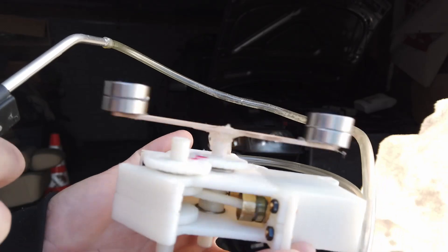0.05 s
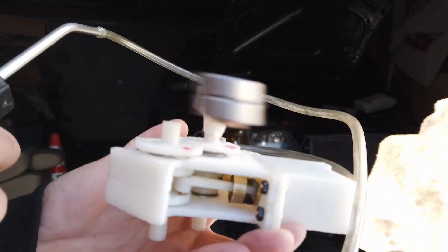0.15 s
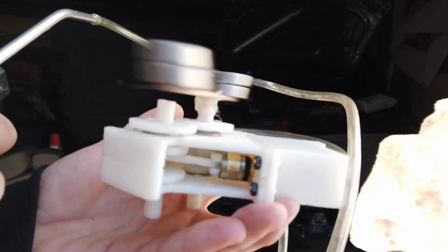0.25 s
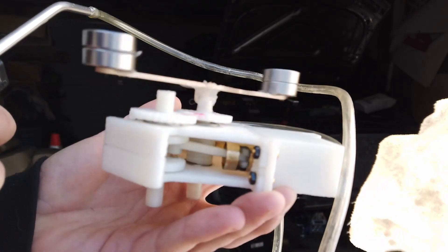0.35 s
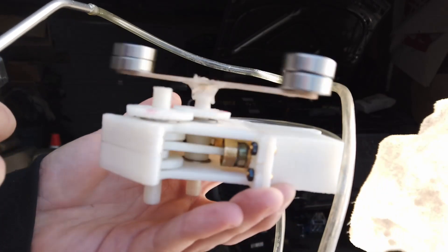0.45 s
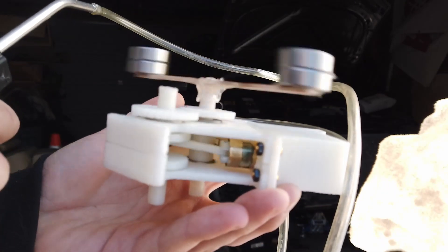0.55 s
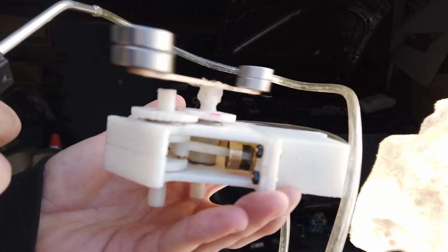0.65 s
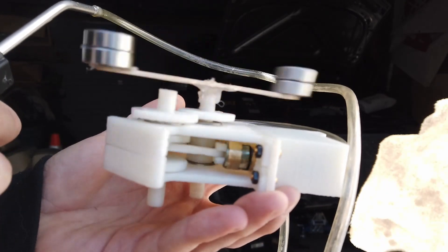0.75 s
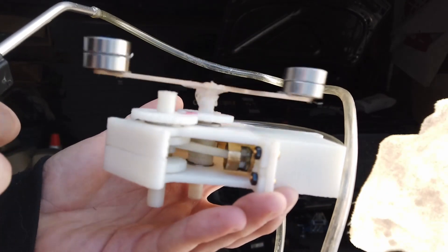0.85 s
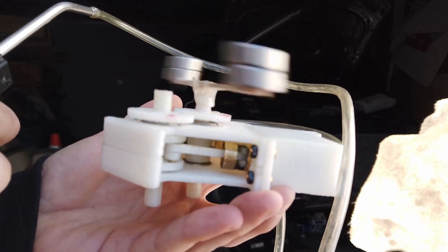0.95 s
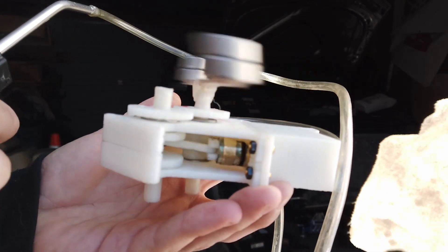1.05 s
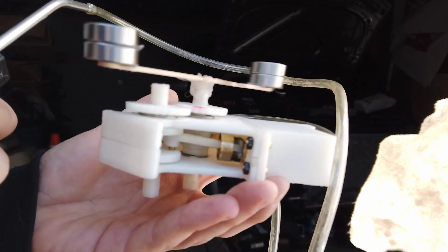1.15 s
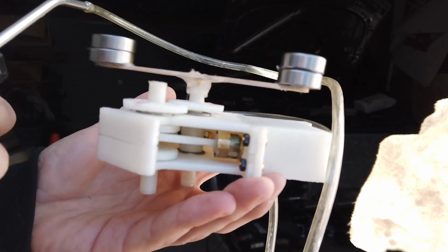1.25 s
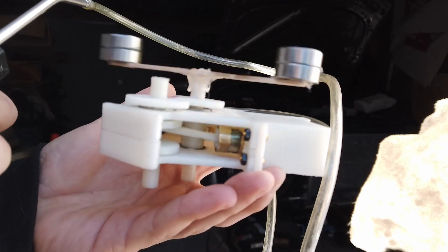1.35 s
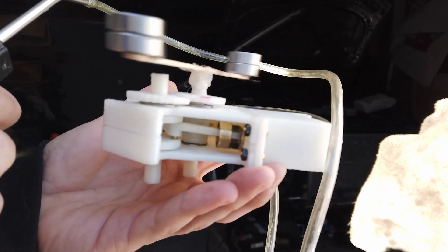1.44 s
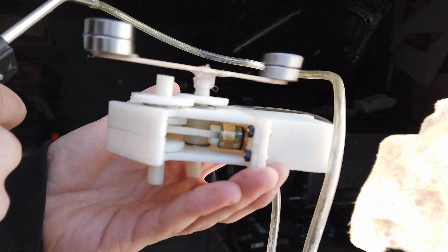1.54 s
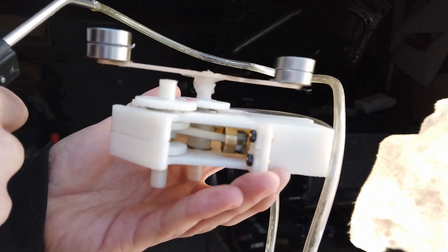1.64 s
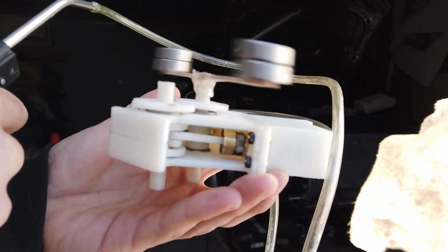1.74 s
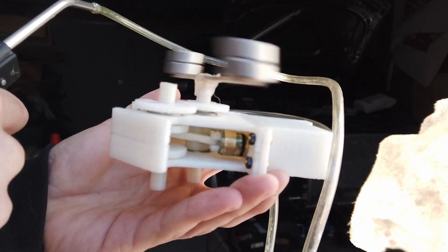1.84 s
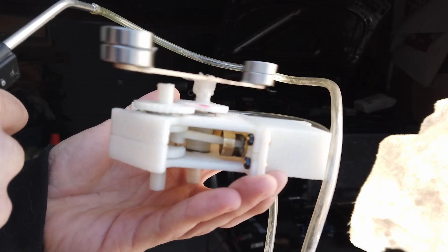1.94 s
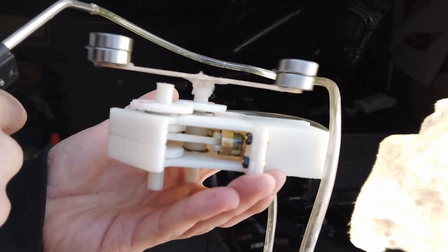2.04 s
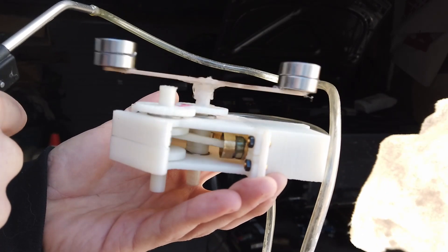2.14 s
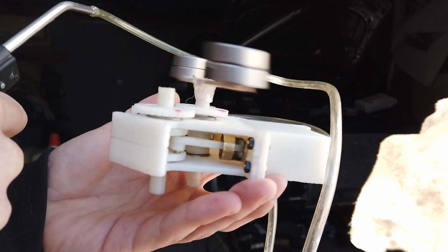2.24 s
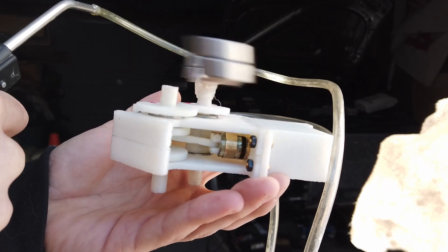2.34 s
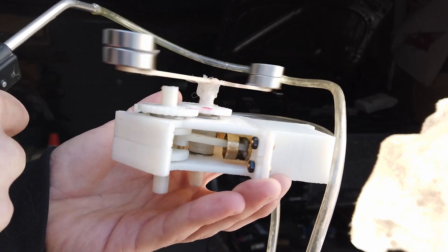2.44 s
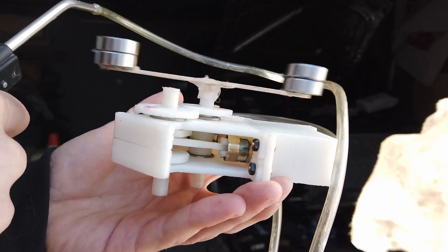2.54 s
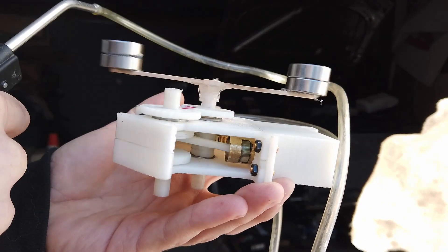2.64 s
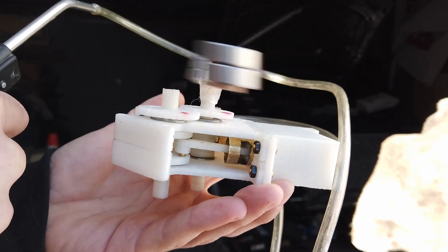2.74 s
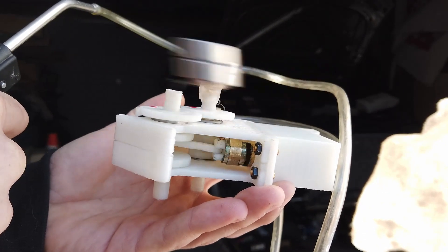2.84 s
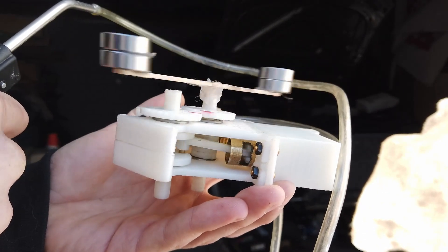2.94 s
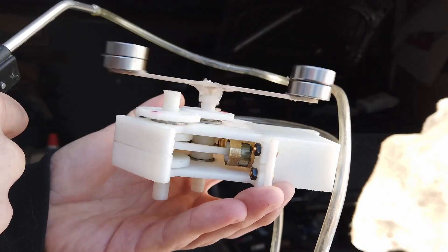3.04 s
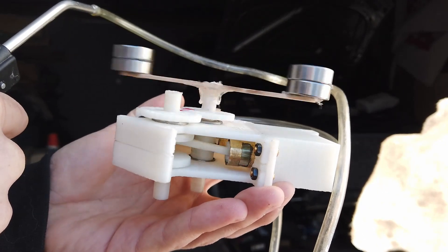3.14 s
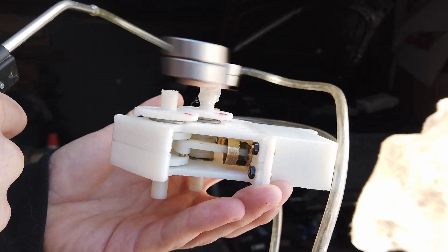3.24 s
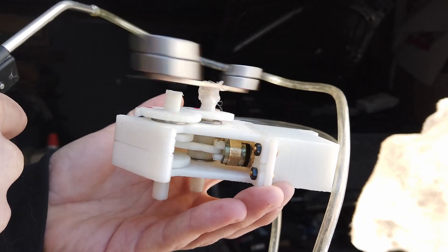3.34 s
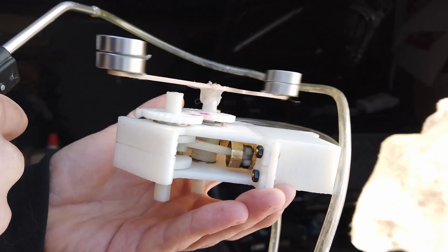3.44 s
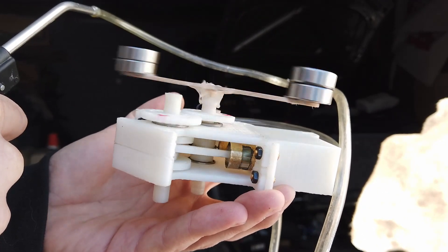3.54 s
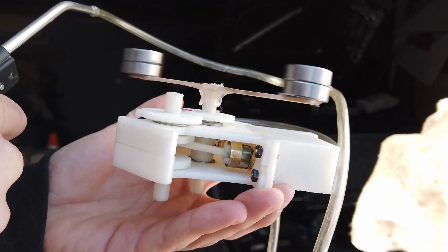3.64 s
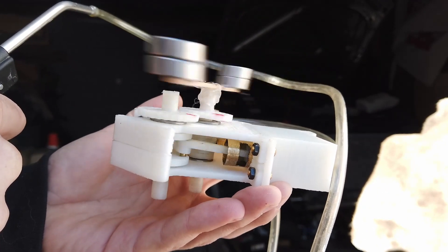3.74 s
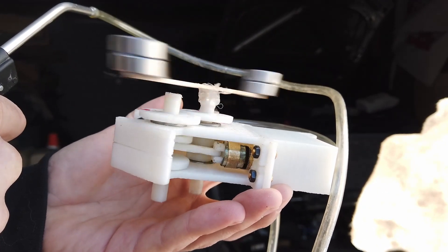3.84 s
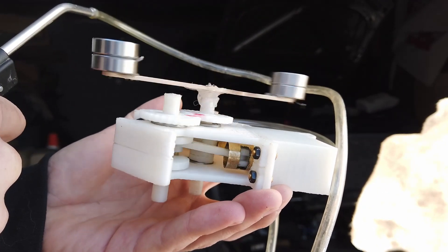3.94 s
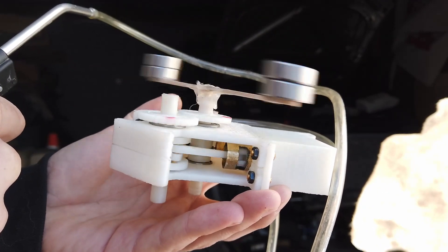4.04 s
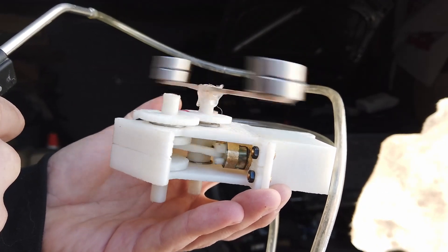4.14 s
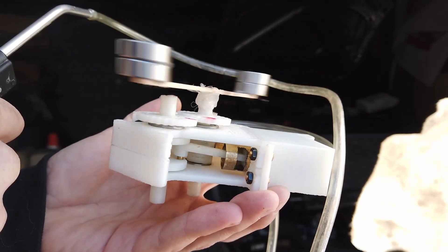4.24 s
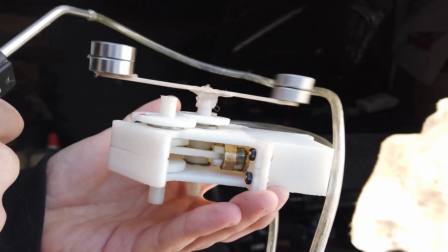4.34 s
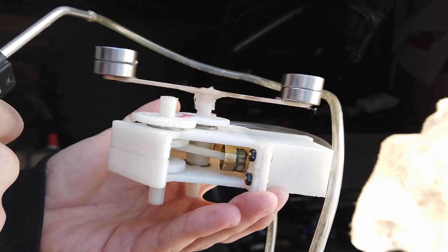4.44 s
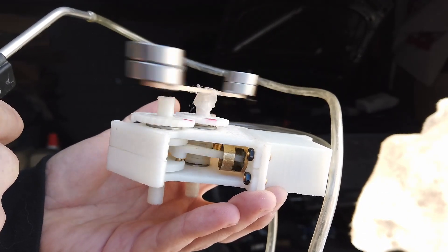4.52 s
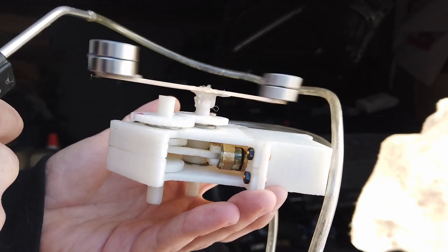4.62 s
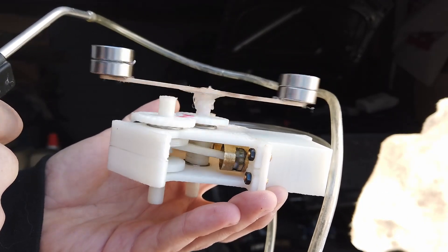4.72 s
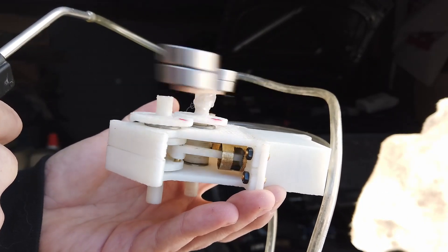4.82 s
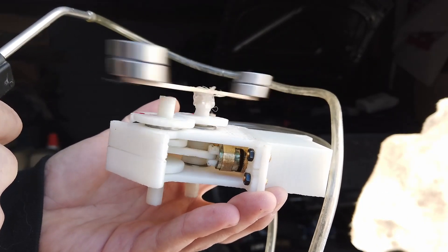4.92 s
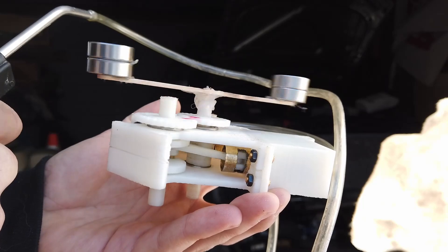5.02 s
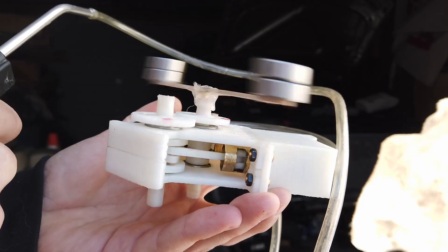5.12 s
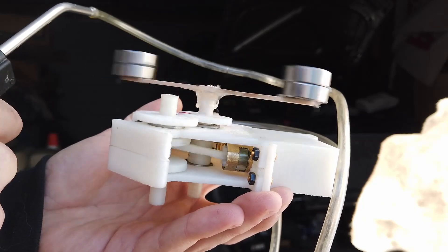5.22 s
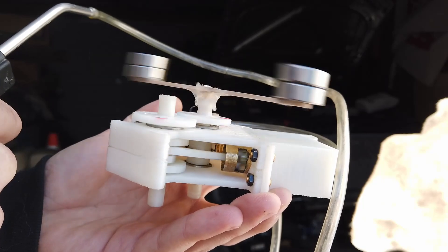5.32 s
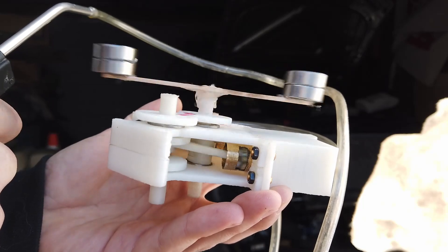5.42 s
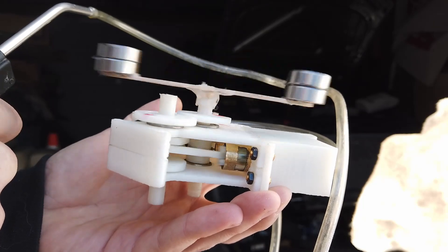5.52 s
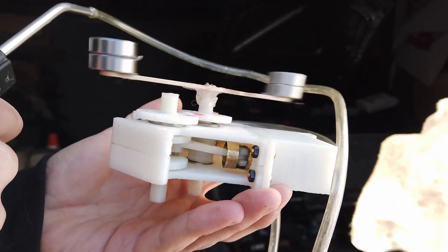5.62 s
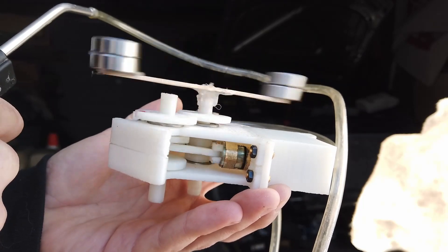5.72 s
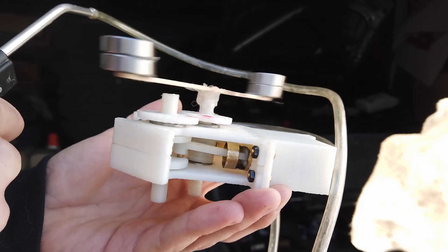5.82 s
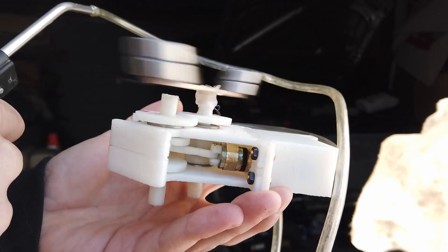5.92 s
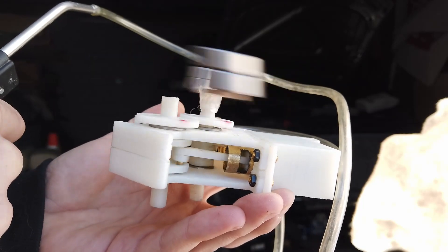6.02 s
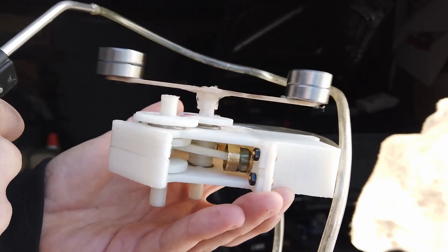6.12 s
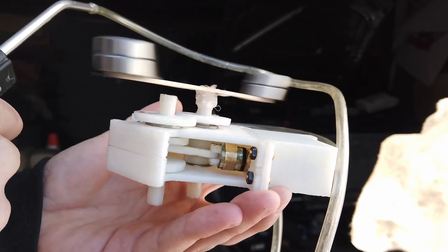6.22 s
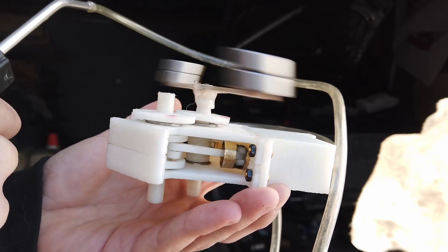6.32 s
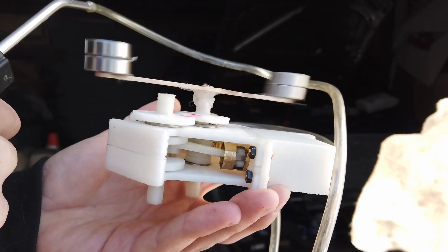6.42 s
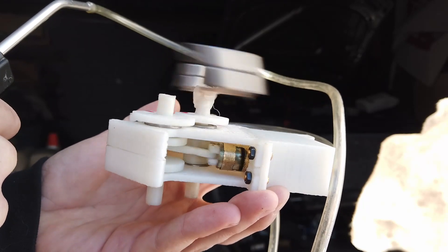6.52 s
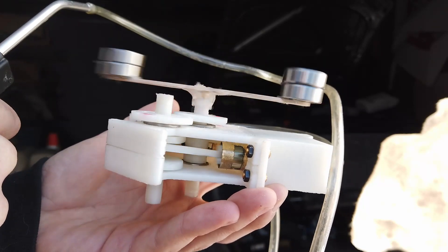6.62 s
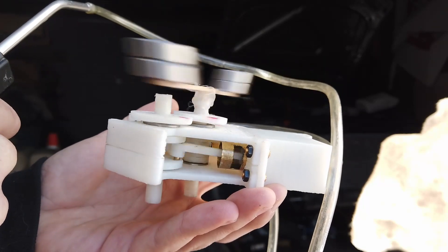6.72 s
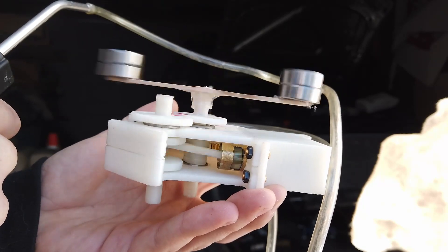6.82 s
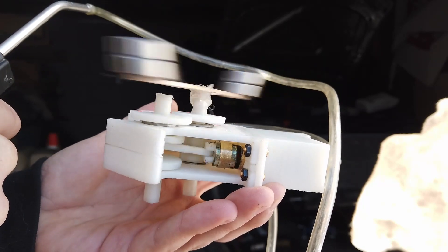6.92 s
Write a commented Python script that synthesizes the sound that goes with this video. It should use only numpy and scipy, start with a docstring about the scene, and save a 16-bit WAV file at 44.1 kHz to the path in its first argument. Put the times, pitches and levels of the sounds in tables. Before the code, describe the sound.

A small hand-held plastic engine driven by compressed air is already running, very close to the microphone and a touch louder in the first half second. It turns just under four times a second. Each turn repeats one pattern: thin leaking air with light, uneven rattles, a crisp bouncing tick, a spurt of bright inlet hiss, a rasp and hollow knock, then a short hard exhaust blast ending in a clack. The pace barely wavers until 4.3 seconds; soft low handling thumps lie underneath around 1.5 and 3.9. Near 4.8 it sags to about three and a half turns a second, weaker. From 5.2 it surges to over five, and from 6.0 climbs again past seven by 6.9, the blows louder, tighter and crowding together. The strongest ones overload with a crunch. A faint workshop rumble and short diffuse echo surround it, and it is still running at the end.

```python
"""A hand-held plastic compressed-air engine, nearest the microphone at first, turns about four times a second.
In every turn air leaks, the linkage ticks, the inlet hisses, the piston knocks, the exhaust blows off with a clack.
Near the end the engine sags, then is given more air in two steps and speeds up.
One speed curve times every event through the crank angle; the air pressure worked out from it sets their strength.
All along, the loudest blows overload the recorder, and the workshop adds a short tail and a faint rumble."""
import sys
import numpy as np
from scipy import signal
from scipy.fft import irfft, next_fast_len
from scipy.io import wavfile

SR = 44100
rng = np.random.default_rng(int(sys.argv[2]) if len(sys.argv) > 2 else 0)


def wrap_up_sound(samples):
    """Save the sound to the file named by the first command line argument, as 16-bit audio."""
    columns = np.atleast_2d(samples).T
    # keep every value between -1 and 1, then stretch to whole-number steps
    tamed = np.clip(columns, -1, 1)
    steps = np.round(tamed * 32767).astype(np.int16)
    wavfile.write(sys.argv[1], SR, steps)


N = 307377
TIME = np.arange(N) / SR  # seconds

IDLE_TURNS_PER_S = 4
# Crank angles in turns, counted from the clack.
START_ANGLE, TICK_ANGLE, INLET_ANGLE, KNOCK_ANGLE, CLACK_ANGLE = .641, .47, .71, .865, 0

# How fast the flywheel turns. Each row: time in seconds, speed in turns per second.
SPEED = [(0, 3.854), (.68, 3.783), (1.3, 3.833), (2.07, 3.906), (2.42, 3.996), (2.98, 3.908), (3.62, 3.949),
         (4.1, 3.842), (4.34, 3.857), (4.81, 3.46), (5.16, 3.632), (5.36, 5.346), (5.62, 5.479),
         (5.97, 5.198), (6.02, 5.946), (6.36, 6.998), (6.9, 7.343)]


def speed_at(t):
    """Flywheel speed in turns per second, in straight lines between the table's points."""
    return np.interp(t, *np.transpose(SPEED))


# At speed the tick comes later in the turn, the inlet and the knock earlier.
# Each row: crank angle in turns, delay in turns for each turn per second above idle.
VALVE_DELAY = [(0, 0), (TICK_ANGLE, .0107), (INLET_ANGLE, -.005), (KNOCK_ANGLE, -.0066), (1, 0)]


def crank():
    """Crank position in turns: the speed summed up, with the valve timing shifting as the engine runs faster."""
    speed = speed_at(TIME)
    turns = START_ANGLE + np.cumsum(speed) / SR
    delay_per_speed = np.interp(turns % 1, *np.transpose(VALVE_DELAY))
    return turns - (speed - IDLE_TURNS_PER_S) * delay_per_speed


def passes(turns, angle):
    """The times in seconds at which the crank passes an angle, once a turn."""
    whole_turns = np.floor(turns - angle)
    return np.flatnonzero(np.diff(whole_turns) > 0) / SR


# Pressure level at idle speed, the power of speed it rises with, and how long the flywheel takes to follow it.
IDLE_PRESSURE_DB, PRESSURE_POWER, FLYWHEEL_LAG_S = -0.72, 1.68, 0.058


def pressure_at(t):
    """Air pressure in dB: a power of the speed that the flywheel reaches a moment later."""
    speed_ratio = speed_at(t + FLYWHEEL_LAG_S) / IDLE_TURNS_PER_S
    return IDLE_PRESSURE_DB + PRESSURE_POWER * 20 * np.log10(speed_ratio)


# Air flow over one turn, from clack to clack, before the pressure is added.
# Each row: crank angle in turns, hiss in dB, cylinder rasp in dB, draught in dB.
FLOW = [(0, -51, -28, -56), (.1, -68, -39, -41), (.34, -44.5, -50.5, -51), (0.363, -32, -32, -54),
        (.40, -27, -35, -50), (.455, -21, -29.5, -40.5), (.50, -22.5, -27.5, -44.5), (.56, -31.5, -45, -44),
        (.67, -29.5, -28, -45), (.70, -28.5, -31, -31), (.73, -15, -21, -24), (.78, -25.5, -19.5, -32.5),
        (0.857, -30.5, -18, -47), (.885, -30.5, -31, -48), (.95, -31, -39, -31), (1, -41, -23, -45)]
# Colours of the leak, the inlet hiss, the rasp and the draught. Each row: frequency in Hz, level in dB per Hz.
LEAK = [(900, -20.5), (1700, -2.5), (2700, -13.5), (3500, 1.5), (4300, -6.5), (5100, -4), (7600, -12),
        (10200, -1), (11500, -5), (13000, -2), (16000, -10)]
HISS = [(1000, -14.5), (2000, 0), (3000, -10.5), (5000, -8.5), (6200, -7), (8300, -1.5), (10200, -5.5),
        (11300, -6.5), (13000, -7.5), (16000, -13)]
RASP = [(450, -20.5), (650, -19.5), (900, -18.5), (1200, -6.5), (1450, -2), (1700, 1.5), (2050, -2.5),
        (2500, -10.5), (3300, -16), (4300, -19), (7000, -30)]
DRAUGHT = [(15, -18), (60, -2), (100, -6), (150, -6.5), (250, -5.5), (400, -13.5), (650, -19), (1500, -36)]
# Narrow resonances of the valve port, heard in the jets. Each row: frequency in Hz, width in Hz, level in dB.
PORT = [(10160, 135, 8.5), (10360, 320, 7)]


def air(turns, leak_share=0.74, rasp_follow=1.26):
    """Leak, inlet hiss, rasping cylinder cavity and a low draught: noises whose levels follow the crank."""
    angle = turns % 1
    pressure_db = pressure_at(TIME)
    points, *columns = np.transpose(FLOW)
    hiss_db, cavity_db, draught_db = (np.interp(angle, points, c) for c in columns)
    # the leak follows the pressure less than the open inlet does
    drive_db = np.where(angle > .66, 1, leak_share) * pressure_db
    jet = np.where(angle < TICK_ANGLE, noise(LEAK, PORT), noise(HISS, PORT))
    hiss = jet * undb(hiss_db + drive_db) * flutter(300, depth_db=2.5)
    rasp = noise(RASP) * undb(cavity_db + rasp_follow * drive_db) * flutter(350, depth_db=2.5)
    draught = noise(DRAUGHT, apart=0.047) * undb(draught_db + drive_db)
    return hiss + rasp + draught


# How one blast swells and dies, before pressure and chance. Each row: seconds from the clack, level in dB.
BLAST = [(-.016, -72), (-.0112, -55), (-.0092, -19.5), (-.006, -12), (-.0035, -8), (-.001, -12),
         (.003, -21), (.01, -40.5), (0.022, -74)]
# Colour of the exhaust jet. Each row: frequency in Hz, level in dB per Hz.
EXHAUST = [(20, -8), (100, -1.5), (200, -3.5), (480, -4), (850, -3.5), (1200, -3.5), (1800, 0.5),
           (2800, -14), (5200, -8), (6500, -12), (8200, -4), (10200, -7.5), (11300, -10.5), (16000, -18)]


def exhaust(turns, shorten_per_db=0.0046, follow=0.58, blast_db=0.5, scatter_db=1.55):
    """The port opens just before each clack and the cylinder empties, quicker and louder at high pressure."""
    lag, shape_db = np.transpose(BLAST)
    clack = passes(turns, CLACK_ANGLE)[:, None]  # one row for each blast
    pressure_db = pressure_at(clack)
    exhaust_db = blast_db + follow * pressure_db + scatter_db * rng.standard_normal(clack.shape)
    times = clack + lag * (1 - shorten_per_db * pressure_db)
    blast = np.interp(TIME, times.ravel(), undb(shape_db + exhaust_db).ravel())
    return noise(EXHAUST, PORT) * blast * flutter(500, depth_db=0.95)


# Exhaust puff: lead before the clack and width, both at 0 dB pressure.
EXHAUST_LEAD_S, EXHAUST_PUFF_S = .0088, .0013
# The share by which each dB of pressure shortens the lead and the puff widths.
QUICKER_PER_DB = .028


def puffs(turns, inlet_follow=0.44, inlet_db=-25, exhaust_follow=1.0, exhaust_db=-17.5,
          knock_follow=0.74, knock_db=-14, clack_follow=0.37, clack_db=-7):
    """Low thuds of air shoved out as ports open and cut off as the piston stops; pressure makes them louder."""
    out = np.zeros((2, N))
    for tick in passes(turns, TICK_ANGLE):
        add_stop(out, tick, width=0.00034, db=0.13 * pressure_at(tick) - 14.5)
    inlets, knocks, clacks = (passes(turns, angle) for angle in (INLET_ANGLE, KNOCK_ANGLE, CLACK_ANGLE))
    for inlet, knock, clack in zip(inlets, knocks, clacks):
        pressure_db = pressure_at(knock)
        quick = 1 - QUICKER_PER_DB * pressure_db
        add_puff(out, inlet + 0.0036, width=0.0026 * quick, db=inlet_db + inlet_follow * pressure_db)
        exhaust_opens = clack - EXHAUST_LEAD_S * quick
        exhaust_puff_db = exhaust_db + exhaust_follow * pressure_db
        add_puff(out, exhaust_opens, width=EXHAUST_PUFF_S * quick, db=exhaust_puff_db)
        add_stop(out, knock, width=0.00085, db=knock_db + knock_follow * pressure_db)
        add_stop(out, clack, width=0.00077, db=clack_db + clack_follow * pressure_db)
    return out


def add_puff(out, centre, width, db):
    """A parcel of air shoved out radiates the slope of its flow: a push and then a pull."""
    reach = 5 * width
    u = np.arange(-reach, reach, 1 / SR) / width
    push_pull = -u * np.exp((1 - u ** 2) / 2)
    add(out, undb(db) * push_pull[None], centre - reach)


def add_stop(out, end, width, db):
    """A flow that is cut off leaves a short dip in pressure."""
    reach = 5 * width
    u = np.arange(-reach, reach, 1 / SR) / width
    dip = -np.exp(-u ** 2 / 2)
    add(out, undb(db) * dip[None], end - width - reach)


# Ringing tones of the tick, the knock and the clack, before the strength of the blow and chance.
# Each row: frequency in Hz, peak level in dB, seconds to fade by 60 dB.
TICK_MODES = [(620, -15.5, 0.014), (1234, -13, 0.013), (1663, -3.5, .017), (2023, -10.5, 0.0097),
              (5000, -23, 0.014), (7200, -13.5, 0.0087), (8140, -14.5, 0.013), (9800, -11, 0.017),
              (10310, -12, 0.015)]
KNOCK_MODES = [(315.4, -7, 0.028), (729, -10.5, 0.0079), (955, -15, 0.035), (1547, 6.5, 0.0088),
               (1781, 5.5, 0.01), (2530, -21, 0.015), (3500, -49, 0.0065)]
CLACK_MODES = [(306.6, -7.5, 0.053), (694, -12, 0.02), (1029, 0.5, 0.03), (1260, 6, 0.0074),
               (1543, 2, 0.012), (2615, -16.5, 0.025), (4020, -26, 0.027)]
# Colour of the tick's noisy crack. Each row: frequency in Hz, level in dB per Hz.
CRACK = [(800, -10), (2500, 3), (4000, -7.5), (8000, -3), (10500, -10), (11500, -11), (16000, -26)]


def linkage(turns, bounce_s=.0025, bounce_db=-6, crack_db=-10, crack_t60=0.021, knock_force=0.62,
            clack_force=0.23, tick_force=0.078, tick_db=-0.4, tick_scatter_db=1.4):
    """The linkage's play closes three times a turn: a bouncing tick, a knock and a clack, harder at high pressure."""
    out, cracks = np.zeros((2, N)), np.zeros((2, N))
    crack = np.exp(-np.log(1000) * TIME[None, :SR // 10] / crack_t60)
    for tick in passes(turns, TICK_ANGLE):
        blow_db = tick_db + tick_force * pressure_at(tick) + tick_scatter_db * rng.standard_normal()
        add(out, ring(TICK_MODES) * undb(blow_db), tick)
        bounce = tick + bounce_s * (1 + 0.088 * rng.standard_normal())
        add(out, ring(TICK_MODES) * undb(blow_db + bounce_db), bounce)
        add(cracks, crack * undb(blow_db + crack_db), tick)
    for knock in passes(turns, KNOCK_ANGLE):
        add(out, ring(KNOCK_MODES) * undb(knock_force * pressure_at(knock)), knock)
    for clack in passes(turns, CLACK_ANGLE):
        add(out, ring(CLACK_MODES, detune=0.0023) * undb(clack_force * pressure_at(clack)), clack)
    return out + cracks * noise(CRACK, PORT)


# Light touches of the slack linkage on the return stroke, before pressure and chance.
# Each row: crank angle in turns, level in dB.
CHATTER = [(.283, -21.5), (.327, -15)]


def chatter(turns, force=1.23, scatter_db=2.5, jitter_s=0.00164):
    """The slack linkage rattles lightly and unevenly on the return stroke, ringing three of the tick's modes."""
    out = np.zeros((2, N))
    for angle, db in CHATTER:
        for touch in passes(turns, angle):
            size_db = db + force * pressure_at(touch) + scatter_db * rng.standard_normal()
            add(out, ring(TICK_MODES[1:4]) * undb(size_db), touch + jitter_s * rng.standard_normal())
    return out


# Echo of the workshop in bands of pitch.
# Each row: lowest frequency in Hz, highest frequency in Hz, level in dB, seconds to fade by 60 dB.
ROOM = [(59.5, 240, -35.5, 0.33), (465, 2800, -31, 0.23), (2500, 16500, -22, 0.14)]


def workshop(dry, gap_s=0.012):
    """A short diffuse echo: fading noise, different on each side, that starts after a small gap."""
    t = TIME[:SR // 2]
    response = 0
    for low_hz, high_hz, db, t60 in ROOM:
        band = signal.butter(2, [low_hz, high_hz], "band", fs=SR, output="sos")
        mid, side = signal.sosfilt(band, rng.standard_normal((2, len(t))))
        # low echoes are more alike on the two sides
        stereo = mid + np.array([[1], [-1]]) * side * min(high_hz / 6000, 1)
        tail = stereo * np.exp(-np.log(1000) * t / t60) * (t > gap_s)
        response = response + undb(db) * tail / np.sqrt(np.sum(tail[0] ** 2))
    return signal.fftconvolve(dry, response, axes=1)[:, :N]


# Soft low thumps of handling. Each row: time in seconds, level in dB, length in seconds.
THUMPS = [(1.503, -30, 0.053), (3.85, -27.5, 0.065)]
# Colour of the background rumble. Each row: frequency in Hz, level in dB per Hz.
RUMBLE = [(15, -19), (40, 2), (75, -2), (130, -21), (300, -21), (650, -17), (1000, -27), (4000, -25.5),
          (16000, -52)]
RUMBLE_DB = -44


def rumble():
    """Low background noise that wanders in level, with soft handling thumps made of swelling low noise."""
    swell = sum(undb(db) * np.exp(-((TIME - s) / length) ** 2) for s, db, length in THUMPS)
    thumps = swell * noise([(15, 5), (38, 1), (80, 3), (200, -38), (1000, -70)], apart=0.49)
    background = noise(RUMBLE, apart=0.18) * undb(RUMBLE_DB) * flutter(5.2, depth_db=3)
    return background + thumps


def undb(db):
    """Decibels to gain."""
    return np.exp(np.asarray(db) * (np.log(10) / 20))


def noise(colour, resonances=(), spread_hz=10500, apart=0):
    """Stereo noise with a colour and resonances, its middle at rms 1; the sides agree less toward the treble."""
    hz, db = np.transpose(colour)
    size = next_fast_len(N, real=True)
    f = np.maximum(np.fft.rfftfreq(size, 1 / SR), 1).astype(np.float32)
    peaks = sum(undb(peak_db) ** 2 / (1 + (2 * (f - centre) / width) ** 2)
                for centre, width, peak_db in resonances)
    gain = undb(np.interp(np.log(f), np.log(hz), db)) * np.sqrt(1 + peaks)
    side_gain = gain * np.minimum(apart + f / spread_hz, 1)
    gains = np.array([gain, side_gain], np.float32)
    # pairs of random numbers become complex: a random size and phase at each frequency
    bins = rng.standard_normal((2, 2 * len(f)), dtype=np.float32).view(np.complex64)
    mid, side = irfft(bins * gains, size)[:, :N]
    return np.array([mid + side, mid - side]) / mid.std()


def flutter(rate, depth_db):
    """A gain that wanders at random, with a new goal rate times a second."""
    knots = np.arange(0, N / SR + 1, 1 / rate)
    return undb(depth_db * np.interp(TIME, knots, rng.standard_normal(len(knots))))


def ring(modes, detune=0.017, scatter_db=.5, port_lag=.000012):
    """One blow: fading tones of alternating sign, varied by chance, reaching the left port first."""
    hz, db, t60 = np.transpose(modes)[:, :, None]
    level_chance, pitch_chance = rng.standard_normal((2, len(hz), 1))
    sign = (-1) ** np.arange(len(hz))[:, None]
    side_lag = np.array([0, port_lag])[:, None, None]  # seconds, left and right
    t = np.maximum(TIME[:int(t60.max() * SR)] - side_lag, 0)
    decay = undb(db + scatter_db * level_chance) * np.exp(-np.log(1000) * t / t60)
    tones = np.sin(2 * np.pi * hz * (1 + detune * pitch_chance) * t)
    return np.sum(sign * decay * tones, axis=1)


def add(out, sound, start):
    """Mix a sound into both sides at a time in seconds."""
    i = int(round(start * SR))
    if 0 <= i < N:
        out[:, i:i + sound.shape[1]] += sound[:, :N - i]


# The engine starts nearer to the microphone and the hand draws it back: extra level at the start, time to settle.
NEAR_DB, DRAW_BACK_S = 1.5, 0.46


def scene():
    """The engine, drawn back a little at first, in its room."""
    turns = crank()
    engine = air(turns) + exhaust(turns) + puffs(turns) + linkage(turns) + chatter(turns)
    nearness = undb(NEAR_DB * np.exp(-TIME / DRAW_BACK_S))
    return nearness * engine + workshop(engine) + rumble()


TOP_HZ = 15750


def record(dry):
    """The recorder clips at full scale, then cuts the treble above its top frequency."""
    lowpass = signal.ellip(10, .2, 70, TOP_HZ, fs=SR, output="sos")
    return signal.sosfilt(lowpass, np.clip(dry, -1, 1))


dry = scene()
out = record(dry)
wrap_up_sound(out)
```